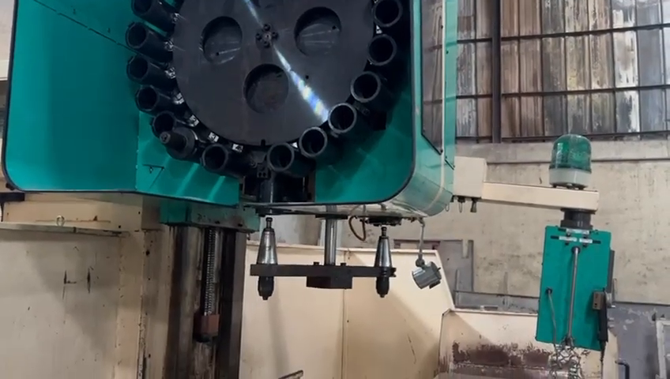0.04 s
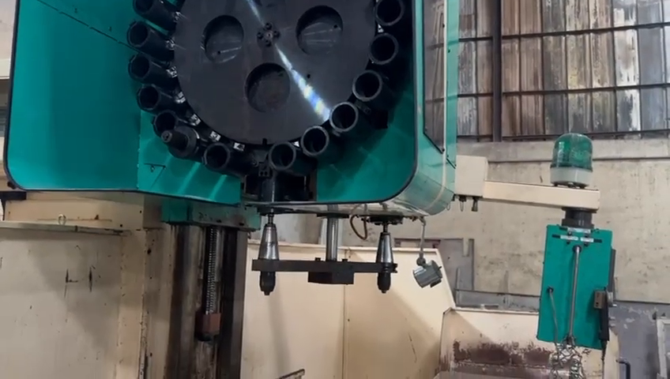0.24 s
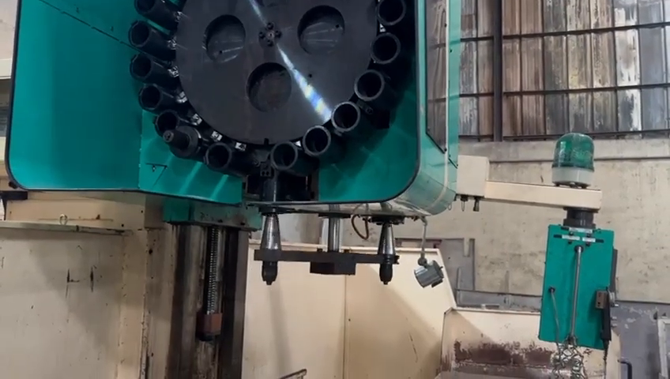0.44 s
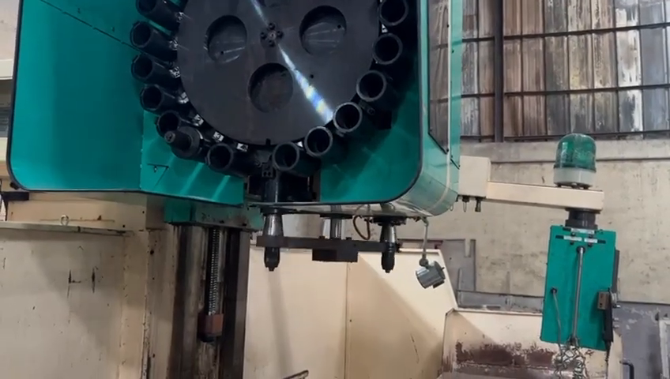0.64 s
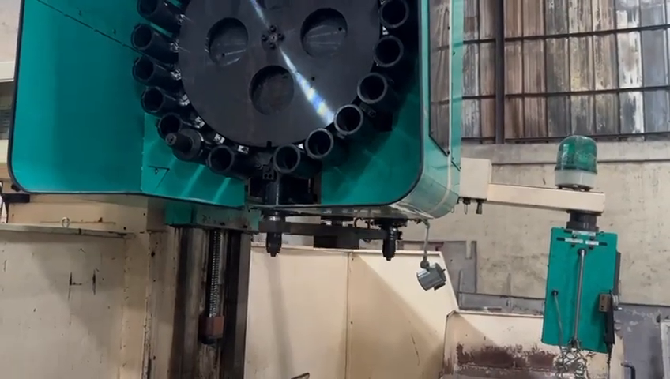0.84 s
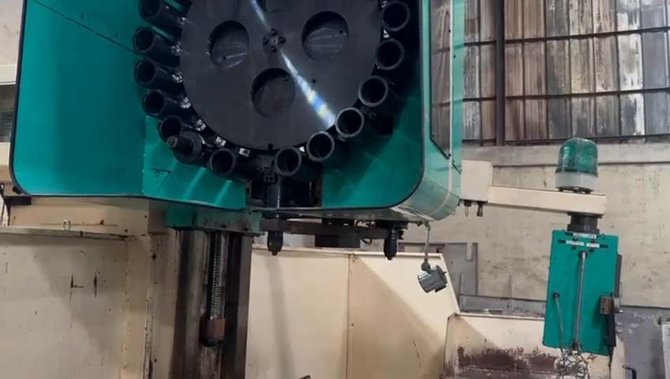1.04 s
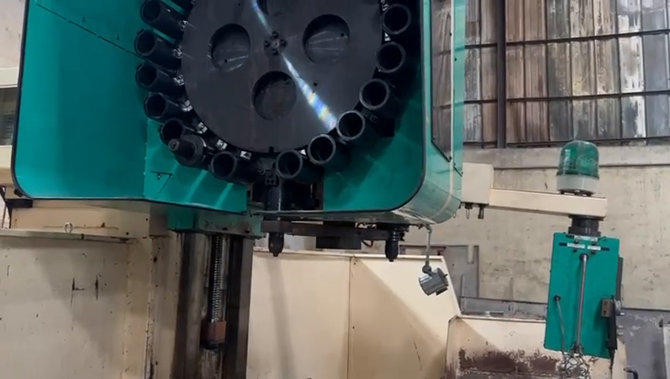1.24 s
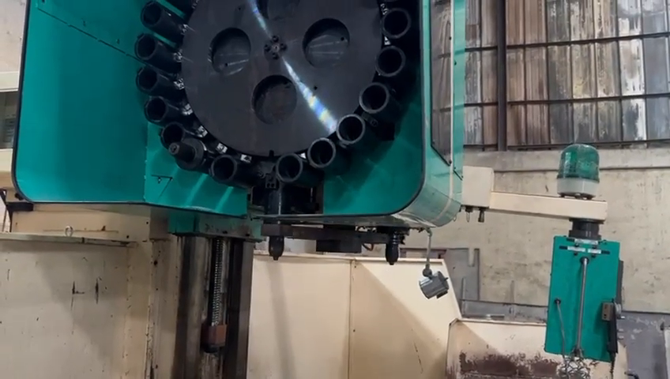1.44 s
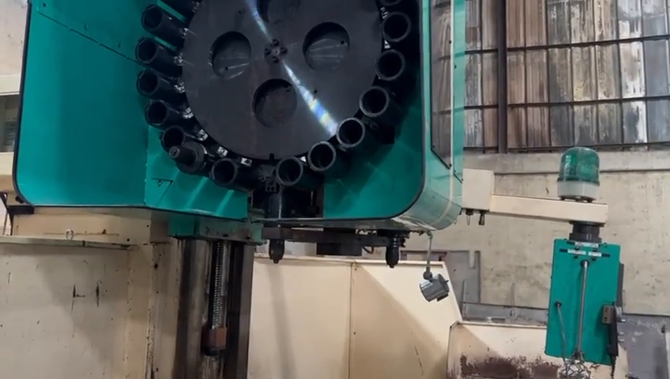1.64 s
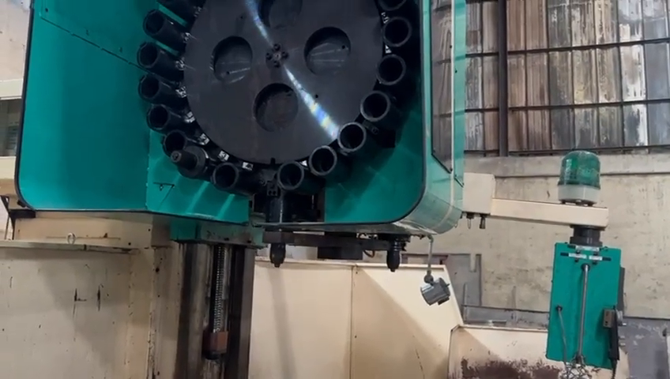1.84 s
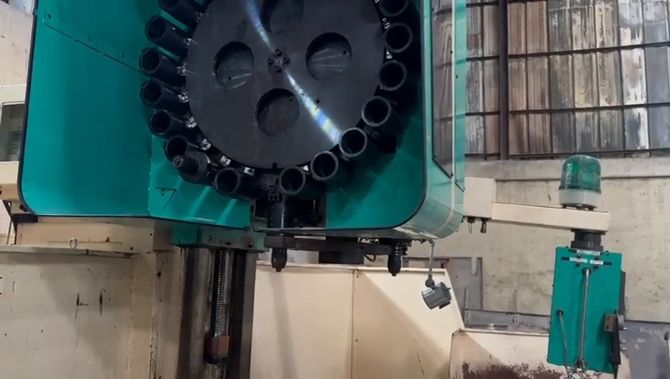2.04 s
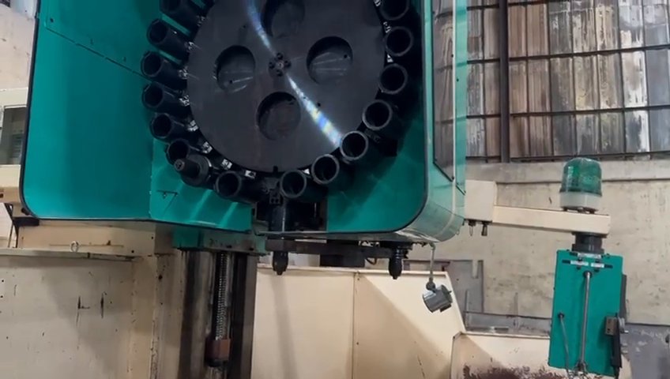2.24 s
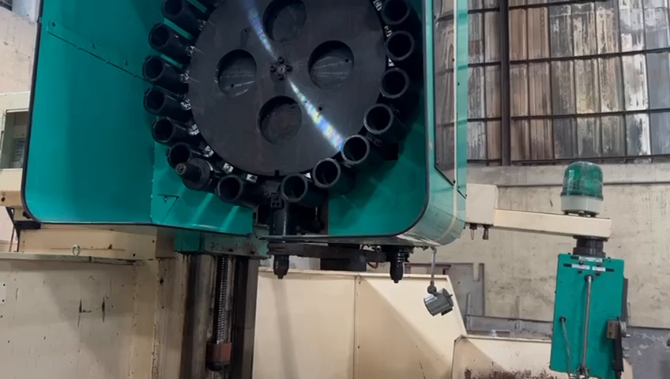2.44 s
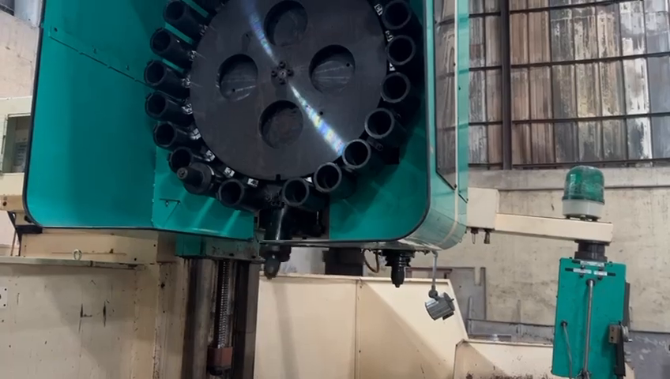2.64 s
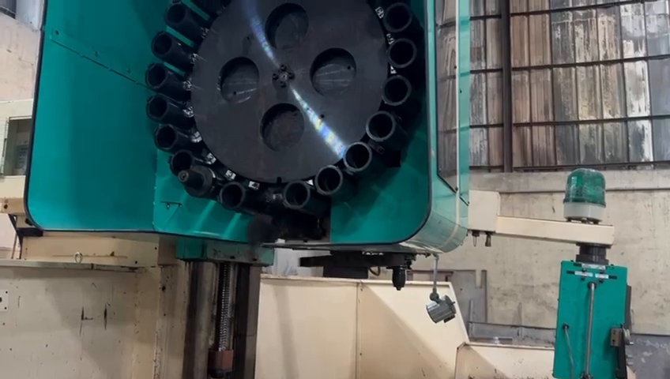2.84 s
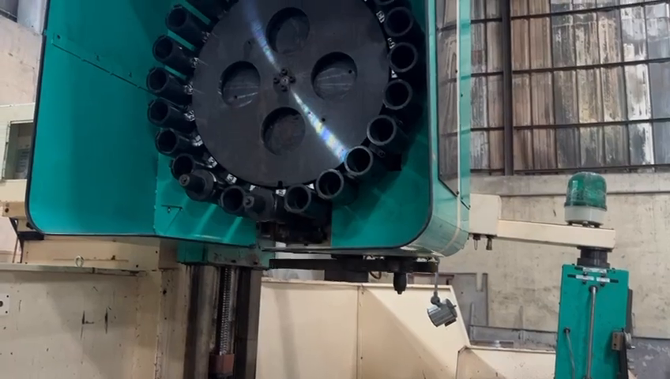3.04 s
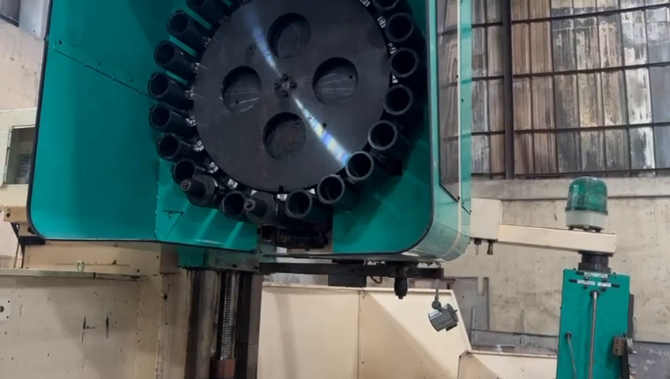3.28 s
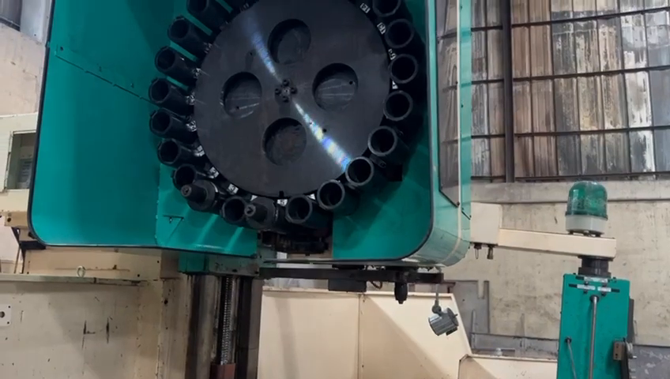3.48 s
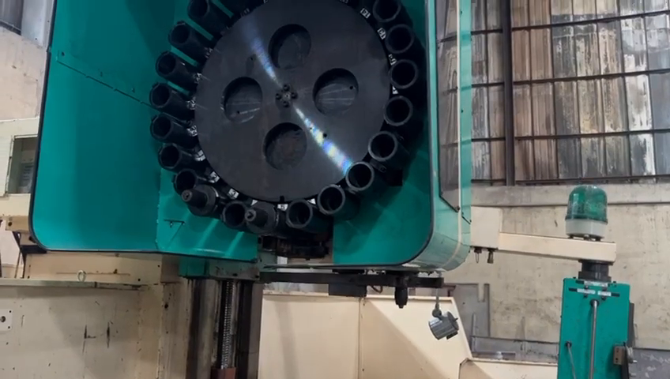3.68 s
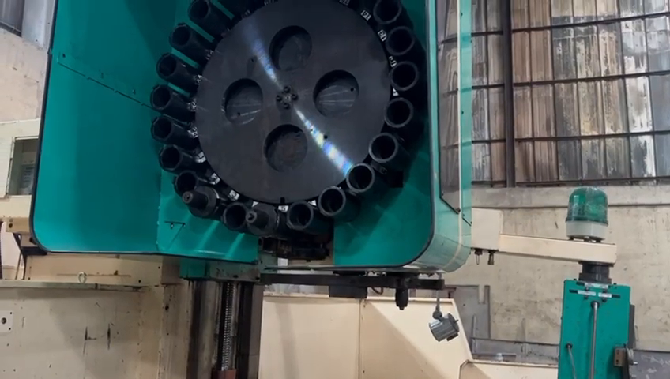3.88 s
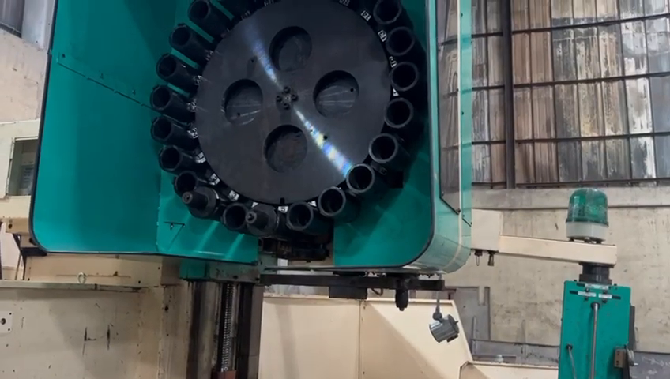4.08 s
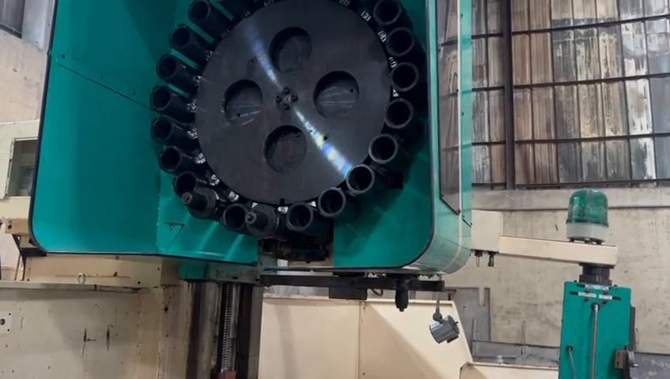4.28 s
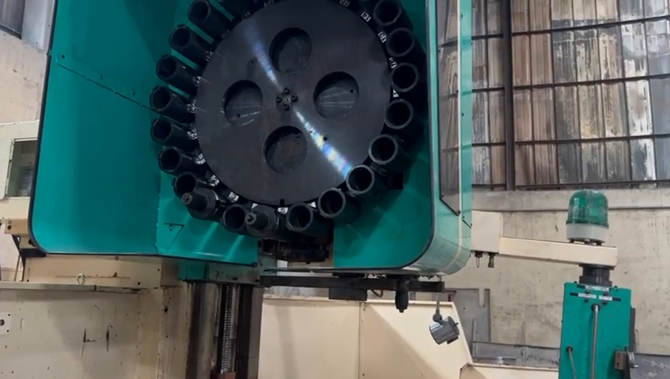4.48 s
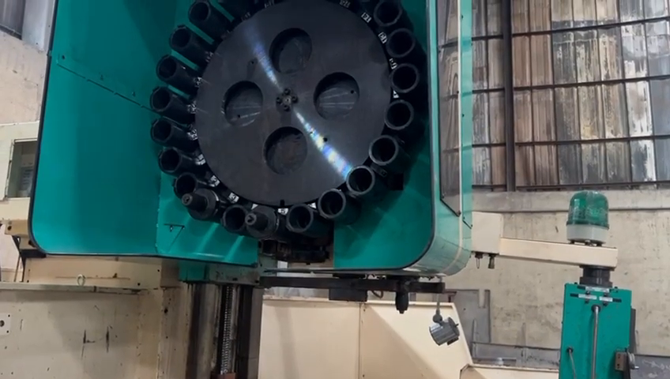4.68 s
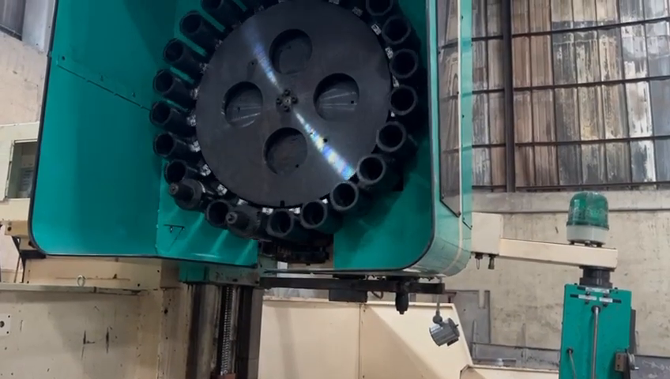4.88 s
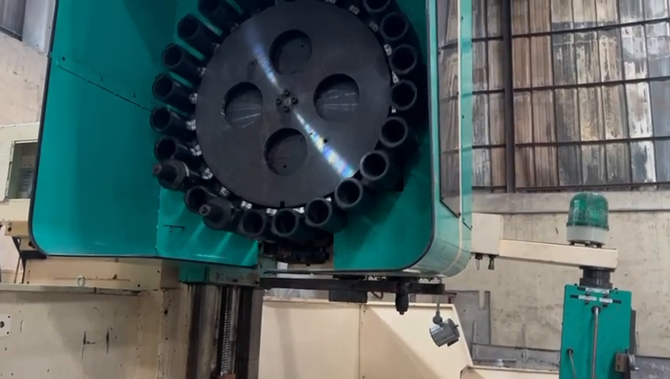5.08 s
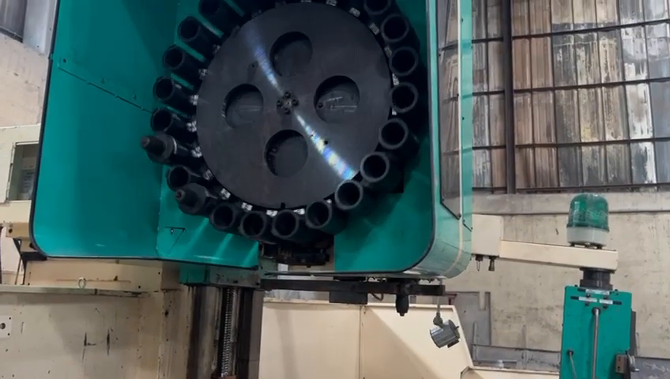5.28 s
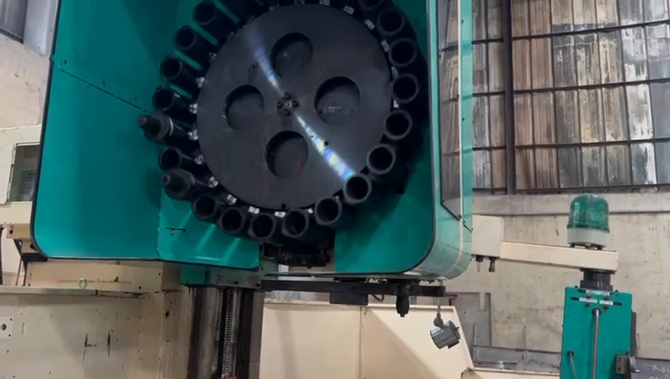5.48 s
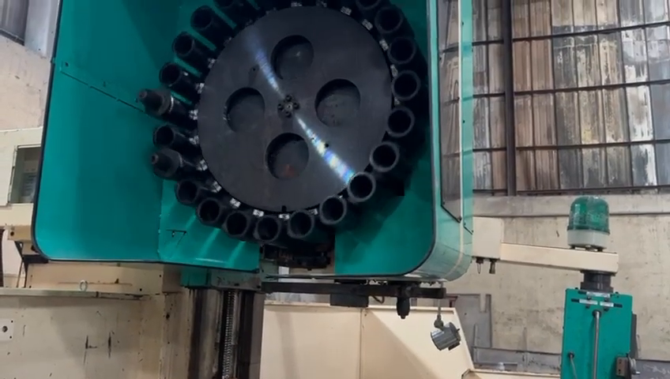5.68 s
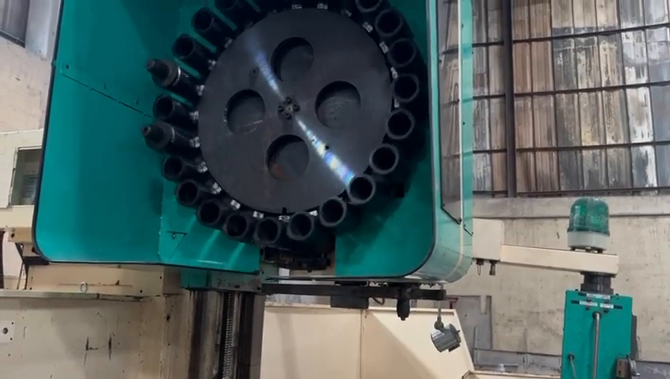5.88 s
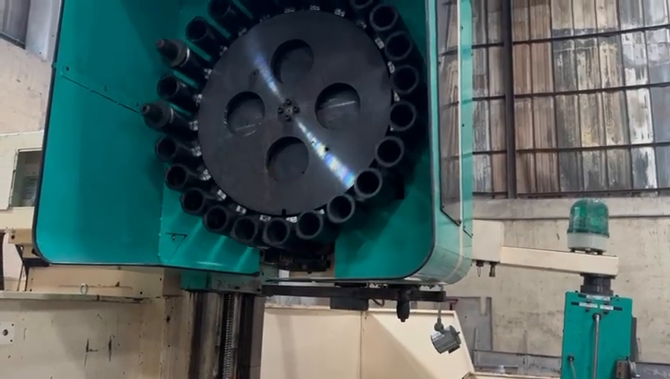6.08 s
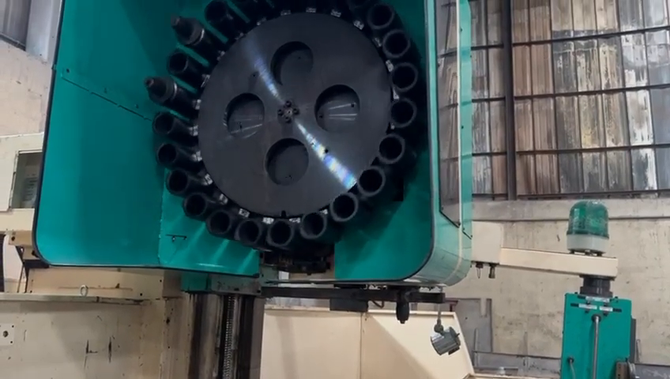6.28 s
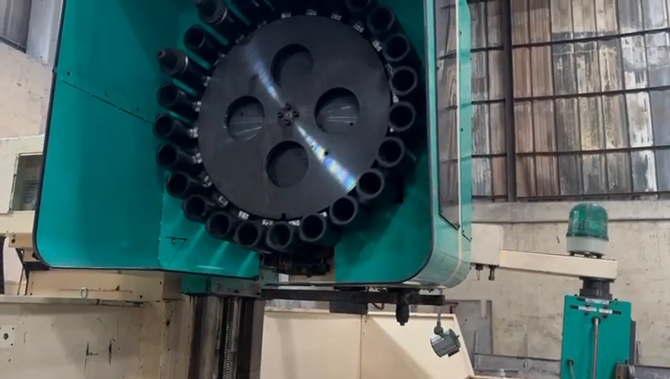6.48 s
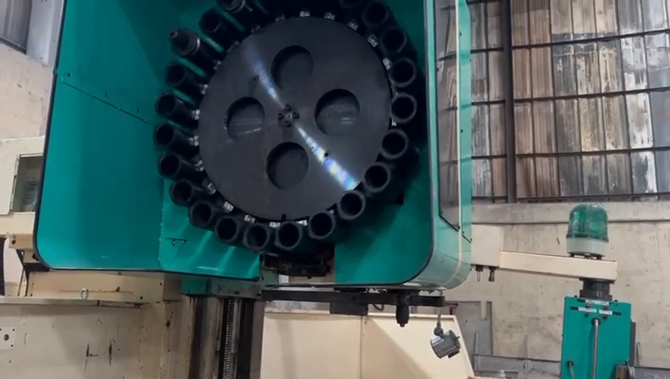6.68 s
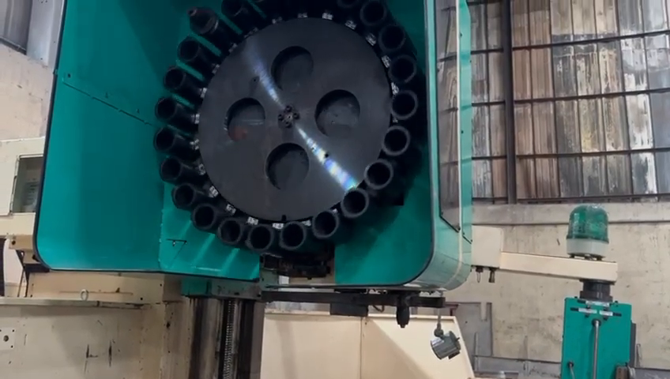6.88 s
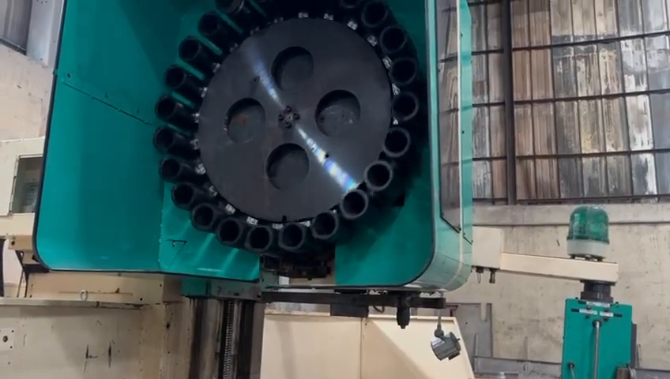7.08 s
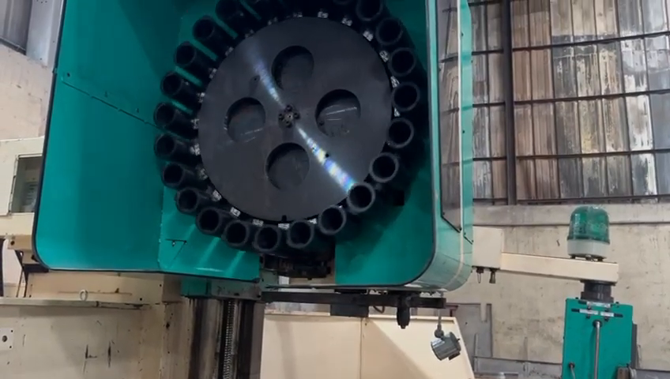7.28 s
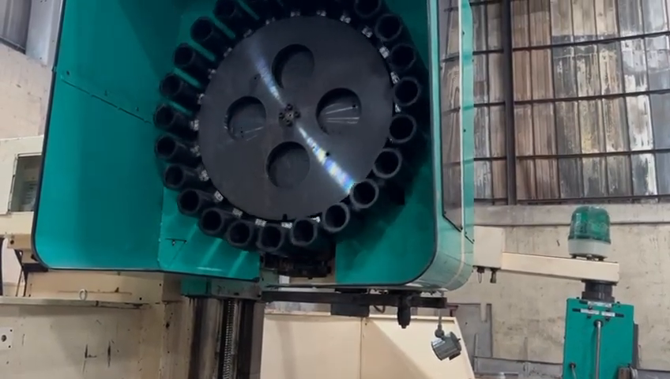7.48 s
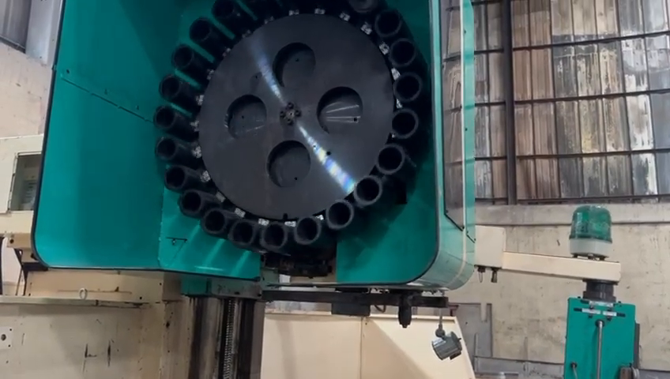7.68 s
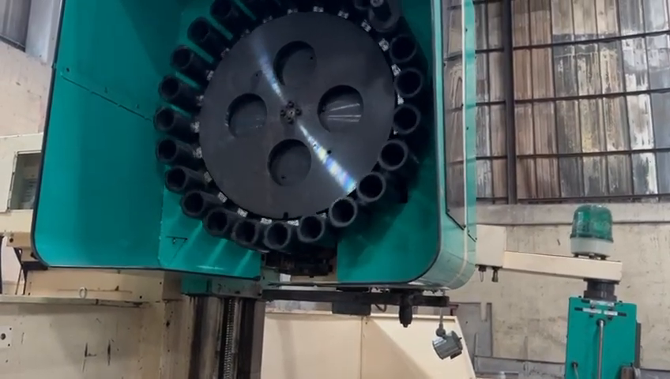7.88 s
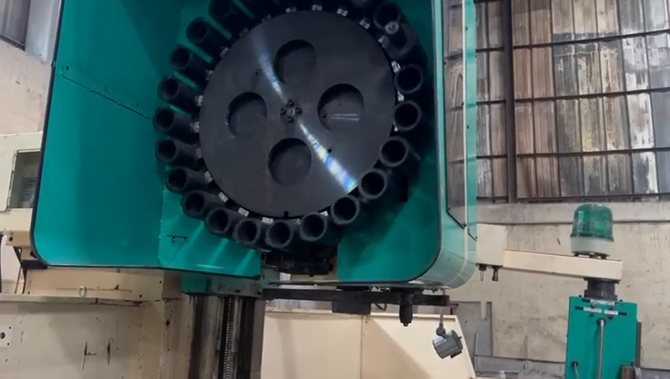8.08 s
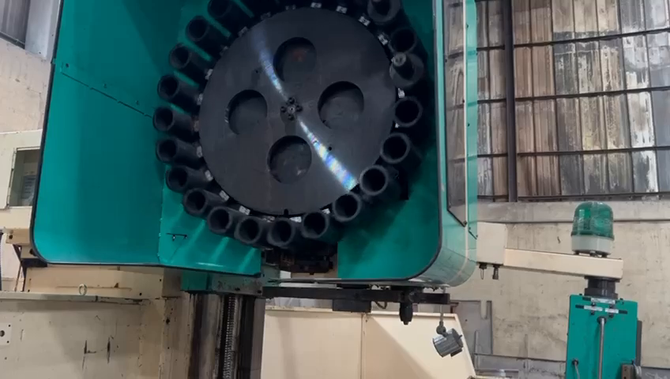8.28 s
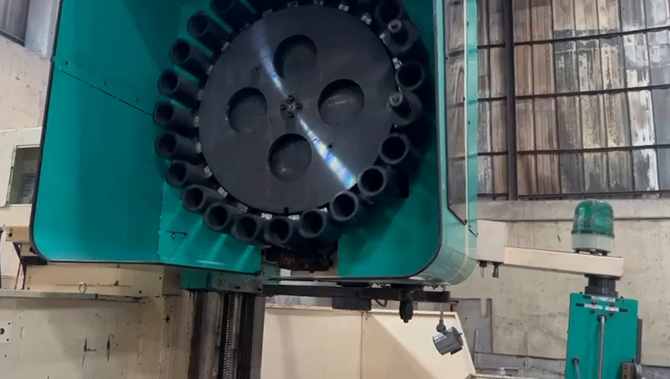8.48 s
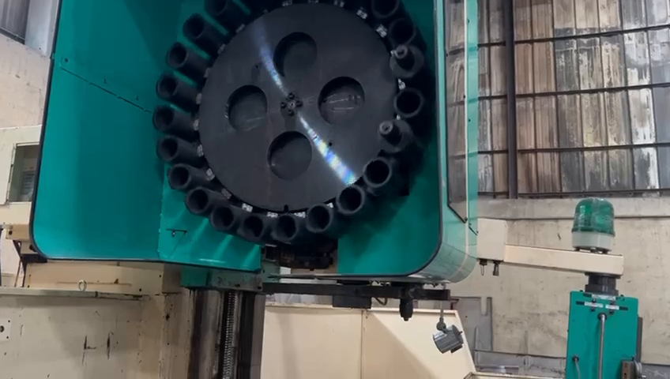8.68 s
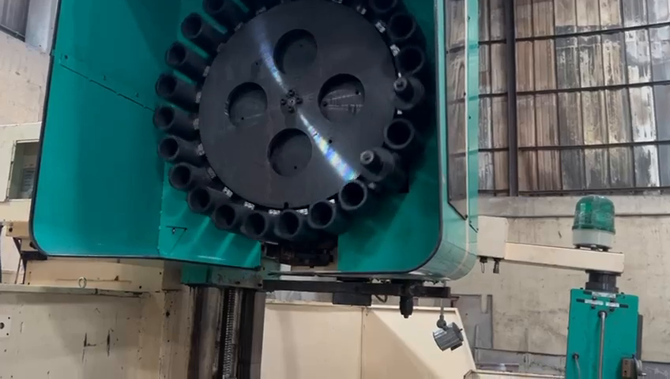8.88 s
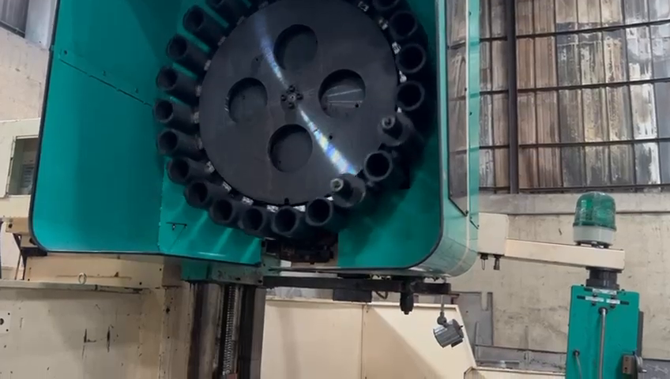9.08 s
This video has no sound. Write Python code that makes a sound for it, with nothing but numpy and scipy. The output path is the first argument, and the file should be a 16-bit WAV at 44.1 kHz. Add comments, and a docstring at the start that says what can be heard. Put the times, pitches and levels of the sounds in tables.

```python
"""A workshop, close to the tool changer of a machining centre, on a stereo pair of microphones.
Room air, mains hum and a pump lie behind. Up front the arm pulls a tool, swings and seats another
with heavy clunks of steel, housing and frame; air valves hiss and squeal. Then the magazine turns:
pocket after pocket rattles and knocks home over the rumble and whine of its drive."""
import sys
import numpy as np
from scipy import signal
from scipy.fft import rfft, irfft
from scipy.io import wavfile
from scipy.ndimage import uniform_filter1d, map_coordinates

SR = 44100
rng = np.random.default_rng(int(sys.argv[2]) if len(sys.argv) > 2 else 0)


def to_wav(sig):
    """Store sig (one row per channel, or 1-D mono) as 16-bit WAV at the path in sys.argv[1].

    Samples outside -1..1 are clipped; the rate is SR.
    """
    pcm = np.clip(np.atleast_2d(sig), -1, 1) * 32767
    pcm = np.round(pcm).astype(np.int16)
    wavfile.write(sys.argv[1], SR, pcm.T)  # frames by channels


N = 402631
TIME = np.arange(N) / SR

# resonances of the arm and headstock: f/Hz, width/Hz, lift/dB
HEAD_MODES = [(96, 7, 7), (111.5, 6, 5.5), (156.5, 11, 5), (176, 9, 3), (195, 5.7, 11), (273, 13, 6),
              (317, 22, 4), (430, 17, 5.5), (482, 11, 9), (535, 19, 7), (660, 25, 4), (900, 66, 1),
              (1140, 120, 7), (1330, 60, 1.5), (1557, 53, 7), (2440, 60, 6), (2900, 45, 5)]
# resonances and hollows of the magazine and its sheet-steel cover: f/Hz, width/Hz, lift/dB
MAGAZINE_MODES = [(65.5, 5.2, 13.5), (96, 6, 11), (162, 23, 3), (195.9, 3.2, 15.5), (221.9, 4.2, 12.5),
                  (267, 7.3, 6), (302, 6, 1.5), (430, 13.2, 6.5), (465, 30, 8.5), (624, 37, 4),
                  (685, 17, 4.5), (880, 32, 3), (1083, 13, 8.5), (1135, 19, 4.5), (1363.6, 11, 10),
                  (1664, 16, 12), (1810, 16, 5), (1860, 12, 3), (2010, 25, 4), (2237, 24, 7.5),
                  (2440, 65, -2), (2550, 31, 9), (2680, 350, -0.5)]
# colour of a click of steel: f/Hz, level/dB
CLICK_COLOUR = [(1200, -18), (3000, -1), (5500, 3), (8000, -2.5), (11500, -0.5)]


def from_db(db):
    """Decibels to gain."""
    return 10 ** (np.asarray(db) / 20)


def rms_one(x):
    """Scale to unit rms."""
    return x / np.sqrt(np.mean(x ** 2) + 1e-20)


def in_time(rows):
    """Each column of a curve at every sample."""
    s, *columns = np.transpose(rows)
    return [np.interp(TIME, s, c) for c in columns]


def at_hz(points, hz):
    """Read a table on a log-frequency axis."""
    f, value = np.transpose(points)
    return np.interp(np.log(hz + 1), np.log(f), value)


def drift(per_s):
    """Random wander of unit rms, with per_s turning points a second."""
    knots = rng.standard_normal(N // 8)
    position = np.arange(0, N + 16, 16) / SR * per_s
    return rms_one(map_coordinates(knots, [position], order=1))[np.arange(N) // 16]


def burst(start_s, rise_s, hold_s, dying_s):
    """Envelope that rises, holds and dies away."""
    t = TIME - start_s
    return np.clip(t / rise_s, 0, 1) * np.exp(-np.maximum(t - rise_s - hold_s, 0) / dying_s)


def tone(hz, db, waver_hz=0.686, waver_db=1.25):
    """A sine wavering slightly in level and pitch."""
    amplitude = np.sqrt(2) * from_db(db + waver_db * drift(9))
    return amplitude * np.sin(2 * np.pi * np.cumsum(hz + waver_hz * drift(7)) / SR)


def body(colour, modes=(), size=16384):
    """Impulse response of unit energy: a broad colour with resonances standing out of it."""
    hz = np.arange(size // 2 + 1) * SR / size
    gain = from_db(at_hz(colour, hz)) * hz / np.hypot(hz, 20) + 1e-6
    for centre, width, lift_db in modes:
        gain *= np.sqrt(1 + (from_db(lift_db) ** 2 - 1) / (1 + (2 * (hz - centre) / width) ** 2))
    cepstrum = irfft(np.log(gain))
    cepstrum[1:size // 2] *= 2   # minimum phase: nothing rings before the blow
    cepstrum[size // 2 + 1:] = 0
    response = irfft(np.exp(rfft(cepstrum)))[:size // 2]
    return response / np.linalg.norm(response)


def through(x, response):
    """Drive a response with a signal."""
    return signal.oaconvolve(x, response)[:len(x)]


def running(force, response):
    """A response under a force that has long been acting; rms 1."""
    return rms_one(through(np.concatenate([force[-len(response):], force]), response)[-N:])


def contacts(per_s, spread_db, count=N):
    """Random tiny impacts of uneven size."""
    sizes = from_db(spread_db * np.clip(rng.standard_normal(count), -2, 2))
    return sizes * rng.choice([-1, 1], count) * (rng.random(count) < per_s / SR)


def strike(out, s, db, dying_s, response, rise_s, per_s, size=14000):
    """Add one blow: parts with play meet in a dying burst of contacts, which rings the body."""
    t = np.arange(size) / SR
    envelope = np.minimum(t / rise_s, 1) * np.exp(-np.maximum(t - rise_s, 0) / dying_s)
    blow = through(contacts(per_s, spread_db=3.96, count=size) * envelope, response)
    blow *= from_db(db) * np.linalg.norm(envelope) / (np.linalg.norm(blow) + 1e-12)
    start = min(int(s * SR), N)
    out[start:start + size] += blow[:N - start]


def in_room(x, wet_db, size=32768):
    """Direct sound and the workshop's diffuse tail, which dies sooner in the treble."""
    # reverberation time: f/Hz, t60/s
    room_t60 = [(100, 0.85), (500, 0.73), (2000, 0.56), (9000, 0.25)]
    t, tail, edges = np.arange(size) / SR, 0, np.geomspace(40, 14000, 9)
    for low, high in zip(edges, edges[1:]):
        bandpass = signal.butter(2, [low, high], "band", fs=SR, output="sos")
        band = signal.sosfilt(bandpass, rng.standard_normal(size))
        tail += band * from_db(-60 * t / at_hz(room_t60, np.sqrt(low * high)))
    tail *= np.minimum(t / 0.0066, 1)
    return x + from_db(wet_db) * through(x, tail / np.linalg.norm(tail))


def panels(x, lowest_hz=1800):
    """Small sheet panels nearby reflect only short waves, which combs the treble."""
    # panel echoes: delay/s, level/dB
    echoes = [(.0022, -28), (.00385, -17.5), (.00615, -13.5)]
    treble = signal.sosfilt(signal.butter(2, lowest_hz, "high", fs=SR, output="sos"), x)
    return x + sum(from_db(db) * np.pad(treble, (int(s * SR), 0))[:N] for s, db in echoes)


def stereo(mid, width, scatter_s, oblique, size=16384):
    """The two microphones differ by a phase shift of oblique sound and by reflections."""
    t = np.arange(size) / SR
    scatter = rfft(rng.standard_normal(size) * np.exp(-t / scatter_s) * (t > .003))
    scatter /= np.sqrt(uniform_filter1d(np.abs(scatter) ** 2, size=40))   # equally strong in every band
    paths = (1j * oblique + scatter) / np.hypot(1, oblique)
    response = irfft(paths * from_db(at_hz(width, np.arange(len(paths)) * SR / size)))
    lead = size // 64
    side = signal.oaconvolve(mid, np.roll(response, lead))[lead:lead + N]
    return np.array([mid + side, mid - side])


def room_tone(db=-38):
    """The steady, dull rush of workshop air."""
    # colour of the air: f/Hz, level/dB
    colour = [(25, -27), (50, -4.5), (93, -2), (152, -4.5), (219, -6), (377, -8), (440, -3.5), (584, -10.5),
              (883, -13), (2000, -19), (4160, -26), (6500, -35.5), (8600, -41), (11200, -48)]
    return from_db(db) * running(rng.standard_normal(N), body(colour))


def pump():
    """The pump whines and slows under load; its octave throbs three times."""
    # effort of the pump: t/s, whine/dB, octave/dB
    effort = [(0, -47, -42), (.6, -48, -38.5), (.95, -46, -40), (1.15, -46, -32.5), (1.7, -47, -46),
              (2.3, -49, -45), (2.6, -45.5, -42.5), (3.4, -39.5, -40.5), (3.75, -48, -43), (4.05, -48, -49),
              (4.4, -45.5, -50), (9.13, -45, -60)]
    # pitch of its whine: t/s, f/Hz
    pitch = [(.2, 223.5), (.5, 216.5), (.9, 217), (1.1, 223), (2.4, 223.7), (2.7, 219.5), (3.05, 221),
             (3.35, 223.7)]
    # swells of the octave: middle t/s, half length/s, level/dB
    throbs = [(3.065, 0.063, -30.5), (3.24, 0.034, -31), (3.36, 0.036, -34.5)]
    whine_db, octave_db = in_time(effort)
    hz, = in_time(pitch)
    throb = sum(from_db(db) * np.exp(-((TIME - s) / half_s) ** 2) for s, half_s, db in throbs)
    return tone(hz, whine_db) + np.hypot(from_db(octave_db), throb) * tone(2 * hz, db=0)


def hum(mains_hz=100):
    """Mains hum slowly swells and fades over fainter motor tones."""
    # swell of the hum: t/s, level/dB
    swell = [(.5, -40), (.75, -40), (.9, -58), (1.35, -43), (1.58, -34.5), (2.05, -34), (2.35, -43.5),
             (2.8, -56), (3.08, -39), (3.38, -35), (3.8, -48), (4.15, -35), (4.7, -34.5), (4.9, -46)]
    # steady motor tones: f/Hz, level/dB
    motors = [(195, -54), (226, -49), (301, -50), (422, -50.5), (473, -56), (522, -59), (894, -56),
              (1567, -70), (2213, -65.5)]
    mains_db, = in_time(swell)
    return tone(mains_hz, mains_db) + sum(tone(hz, db) for hz, db in motors)


def cam(rise_s=0.066, dying_s=0.29):
    """The arm's cam gear growls with dense small contacts, once out and once back."""
    # runs of the cam: t/s, hold/s, level/dB
    runs = [(0.147, 1.32, -33.5), (2.337, 0.52, -34.5)]
    # colour of the growl: f/Hz, level/dB
    colour = [(30, -10), (70, 4), (130, 5), (300, 3.5), (480, -2.5), (700, -7), (1300, -18.5), (3000, -22),
              (9000, -65)]
    effort = sum(from_db(db) * burst(s, rise_s, hold_s, dying_s) for s, hold_s, db in runs)
    return effort * running(contacts(1600, spread_db=2.5), body(colour, HEAD_MODES))


def step_times(count=19, first_s=5.0115, step_s=.22234, load_swing_s=.00933, slowest=3.2, per_turn=24):
    """When each magazine step starts: the load of tools slows it going up and speeds it coming down."""
    gaps = step_s + load_swing_s * np.cos(2 * np.pi * (np.arange(count) - slowest) / per_turn)
    return first_s + np.cumsum(gaps) - gaps


def surging(x, swing_db=2.8, peak_lag_s=.095, top_hz=330, step_s=.22234):
    """The bass of the drive swells in the middle of every step and slackens between steps."""
    starts = step_times()
    starts = np.concatenate([[starts[0] - step_s], starts, [starts[-1] + step_s]])
    steps = np.interp(TIME - peak_lag_s, starts, np.arange(len(starts)))
    bass = signal.sosfiltfilt(signal.butter(2, top_hz, fs=SR, output="sos"), x)
    bass_gain = from_db(swing_db * np.cos(2 * np.pi * steps) - 1)
    return x + bass * (bass_gain - 1)


def gear_whine(jitter_hz=4.47, flutter_db=3.6):
    """The magazine's gears sing in unsteady lines, louder once the load of tools runs downhill."""
    # lines of the whine: f/Hz, relative level/dB
    lines = [(466, -16), (684, 0), (1083, -1), (1122, -6), (1364, -9), (1666, -13)]
    # swell of the whine: t/s, level/dB
    swell = [(4.8, -44), (5.6, -50), (6.9, -49), (7.5, -41.5), (8.3, -41), (8.7, -39.5), (9.1, -42)]
    level_db, = in_time(swell)
    return sum(tone(hz + jitter_hz * drift(45), level_db + db + flutter_db * drift(22))
               for hz, db in lines)


def magazine_drive(start_s=4.79, rise_s=0.028, db=-25.5, relative_tick_db=-27):
    """As the magazine turns, its rollers rumble, its gears whine and tools tick in their pockets."""
    # colours of the rollers and of the shaking tools: f/Hz, level/dB
    roller_colour = [(30, -24), (60, -8.5), (120, -3.5), (170, 0.5), (280, -4), (450, -1.5), (700, -3),
                     (1150, -5.5), (1400, -14.5), (1650, -24), (3000, -24), (4200, -30.5), (5500, -32.5),
                     (8300, -35.5), (11500, -34.5)]
    tick_colour = [(1000, -20), (3000, -6), (5500, -5), (8000, -10), (11300, 6)]
    rolling = contacts(2000, spread_db=2.6) * from_db(0.87 * drift(30))
    rumble = surging(running(rolling, body(roller_colour, MAGAZINE_MODES)))
    shaking = contacts(1800, spread_db=3) * from_db(5.1 * np.clip(drift(110), -2, 2))
    ticks = from_db(relative_tick_db) * running(shaking, body(tick_colour))
    turning = np.clip((TIME - start_s) / rise_s, 0, 1)
    return turning * (from_db(db) * (rumble + ticks) + gear_whine())


def valve_hiss(exhaust_leak_db=-64, jet_leak_db=-72):
    """Each valve lets turbulent air out through a wide exhaust and a narrow jet, over a faint leak."""
    # valves venting: t/s, rise/s, hold/s, dying time/s, exhaust/dB, jet/dB
    vents = [(.14, .17, .02, .04, -60, -48), (0.954, 0.047, .015, 0.048, -40.5, -32),
             (1.04, .05, .13, 0.079, -54, -40), (1.617, 0.22, 0.12, 0.53, -41.5, -55.5),
             (2.35, 0.055, .02, .13, -49, -55), (2.45, 0.19, 0.3, 0.083, -65, -43.5),
             (3.02, .1, .08, .08, -64, -50)]
    # colours of the two outlets: f/Hz, level/dB
    exhaust_colour = [(400, -33), (1000, 10.5), (2000, 6.5), (3200, 8), (5000, 1.5), (7000, -12),
                      (11500, -43)]
    jet_colour = [(1500, -27), (4000, 4), (6300, 11.5), (8200, 9), (11500, 4)]
    exhaust, jet = from_db(exhaust_leak_db), from_db(jet_leak_db)
    for s, rise_s, hold_s, dying_s, exhaust_db, jet_db in vents:
        flow = burst(s, rise_s, hold_s, dying_s)
        exhaust = np.hypot(exhaust, from_db(exhaust_db) * flow)
        jet = np.hypot(jet, from_db(jet_db) * flow)
    return (exhaust * running(rng.standard_normal(N), body(exhaust_colour))
            + jet * running(rng.standard_normal(N), body(jet_colour)))


def valve_squeal(jitter_hz=120, flutter_db=2.5, skirt_hz=260, rasp_hz=1000, rasp_db=-16):
    """Unsteady edge tones, in a skirt of turbulence and a wider rasp, sink as the pressure falls."""
    # whistles of a venting valve, one list each: t/s, f/Hz, level/dB
    whistles = [
        [(3.04, 9000, -56), (3.1, 9010, -35), (3.125, 8940, -37), (3.145, 8690, -32), (3.17, 8600, -30),
         (3.2, 8560, -32), (3.225, 8650, -42), (3.25, 8700, -60)],
        [(3.0, 11250, -60), (3.08, 11240, -50), (3.17, 11250, -53), (3.24, 11250, -48), (3.3, 10600, -50),
         (3.36, 10600, -62)],
        [(3.06, 7520, -58), (3.15, 7450, -53), (3.195, 7100, -43.5), (3.24, 6980, -58)],
        [(3.15, 6500, -64), (3.19, 6450, -50), (3.23, 6400, -62)],
        [(3.15, 5200, -62), (3.19, 5180, -49), (3.23, 5150, -62)],
    ]
    # noisy share of each whistle, 0-1
    noisy_shares = [.35, .55, .55, .55, .5]
    out = np.zeros(N)
    for rows, share in zip(whistles, noisy_shares):
        hz, db = in_time(rows)
        phase = 2 * np.pi * np.cumsum(hz + jitter_hz * drift(900)) / SR
        skirt, rasp = (rms_one(signal.lfilter(*signal.butter(2, width, fs=SR), rng.standard_normal(N)))
                       for width in (skirt_hz, rasp_hz))
        edge = (np.sqrt(1 - share) + from_db(rasp_db) * rasp) * np.sin(phase)
        edge += np.sqrt(share) * skirt * np.cos(phase)
        sounding = (TIME > rows[0][0]) & (TIME < rows[-1][0])
        out += np.sqrt(2) * edge * from_db(db + flutter_db * drift(120)) * sounding
    return out


def steel_ring(x, centre_hz=8500, width_hz=380, t60_s=.7, ring_db=-20, skirt_db=-6, size=40000):
    """A sound together with the cluster of close steel modes that it sets ringing."""
    t, hz = np.arange(size) / SR, np.arange(size // 2 + 1) * SR / size
    cluster = from_db(skirt_db) + 1 / (1 + (2 * (hz - centre_hz) / width_hz) ** 2)
    tail = irfft(rfft(rng.standard_normal(size)) * cluster) * from_db(-60 * t / t60_s)
    return x + from_db(ring_db) * np.std(x) * rms_one(through(x, tail))


def latches(dying_s=0.013):
    """Small latches snap shut, each with a short, bright click."""
    # snaps: t/s, level/dB
    snaps = [(1.156, -26.5), (2.503, -41), (2.554, -38)]
    out, steel = np.zeros(N), body(CLICK_COLOUR)
    for s, db in snaps:
        strike(out, s, db, dying_s, steel, rise_s=.004, per_s=5100)
    return out


def arm_groans(rise_s=0.011, dying_s=.012):
    """Under load the arm's drive booms, sinking in pitch as it slows."""
    # booms: t/s, length/s, first f/Hz, last f/Hz, level/dB
    booms = [(.972, 0.042, 168, 158, -18.5), (1.025, .075, 202.7, 185, -22.5),
             (1.105, .04, 184, 170, -23.5), (1.315, .075, 200, 181, -27)]
    out = np.zeros(N)
    for s, length_s, first_hz, last_hz, db in booms:
        hz = np.interp(TIME, [s, s + length_s], [first_hz, last_hz])
        out += burst(s, rise_s, length_s - rise_s, dying_s) * tone(hz, db, waver_hz=1.56, waver_db=1.5)
    return out


def frame_swings(push_s=0.0098):
    """Heavy blows push on the frame, which keeps swinging."""
    # swings of the frame: t/s, f/Hz, level/dB, t60/s
    swings = [(.955, 96.5, -20.5, 0.53), (.953, 1082, -26.5, .35), (1.246, 428, -19.5, 0.26),
              (4.741, 531, -16.5, 0.17), (3.335, 98, -31, .35)]
    out = np.zeros(N)
    for s, hz, db, t60 in swings:
        t = np.maximum(TIME - s, 0)
        out += from_db(db - 60 * t / t60) * np.sin(2 * np.pi * hz * t) * np.minimum(t / push_s, 1)
    return out


def pockets(rattle_db=-20.3, bounce_s=.0125, detune=.007, click_lead_s=.006, rebound_s=.015):
    """Loose pockets clack and bounce as each step starts, then knock home at the pitch of their tool."""
    # ringing of the steel pockets: f/Hz, width/Hz, lift/dB
    modes = [(431, 20, 5), (467, 26, 7.5), (680, 60, 3), (1110, 80, 5), (1360, 23, 6), (1810, 45, 6),
             (2020, 50, 8), (2245, 45, 14), (2440, 90, 6), (2550, 45, 8), (2750, 200, -5), (2937, 45, 10),
             (3140, 120, -8), (3400, 75, 4.5), (3550, 110, -13), (3750, 90, 4.5), (3996, 55, 10),
             (4365, 90, 4), (4490, 100, 9.5), (5760, 230, -6), (6000, 80, 6.5), (6600, 80, 4.5),
             (7880, 90, 8.5), (8330, 110, 7.5)]
    # colours of the rattle and the knock: f/Hz, level/dB
    rattle_colour = [(150, -10.5), (450, 16), (1000, 9.5), (1600, 1.5), (2500, 1), (4400, -3), (6000, -11),
                     (8300, -10.5), (11500, -15)]
    knock_colour = [(100, -16), (300, -9), (480, -5), (640, 1), (980, -1.5), (1250, -8), (1700, -21),
                    (3000, -25.5), (4400, -31), (6500, -32), (11500, -46)]
    # pockets knocking home: t/s, level/dB, dying time/s, tool f/Hz
    knocks = [(4.815, -19.5, .045, 1120), (5.048, -24, .02, 480), (5.277, -23, .018, 1090),
              (5.511, -13.5, 0.0086, 1020), (5.743, -13.5, 0.014, 686), (5.973, -13, .012, 945),
              (6.204, -11.5, 0.013, 630), (6.433, -12.5, 0.013, 650), (6.662, -12.5, 0.009, 630),
              (6.891, -18, .015, 1000), (7.118, -16.5, 0.01, 1000), (7.336, -12, .0094, 640),
              (7.558, -12.5, 0.016, 850), (7.775, -13, 0.02, 1000), (7.994, -11.5, 0.014, 900),
              (8.206, -9.5, 0.015, 885), (8.427, -20, 0.021, 680), (8.637, -19, 0.02, 680),
              (8.857, -24.5, .015, 700), (9.067, -22.5, .016, 640)]
    out, steel = np.zeros(N), body(CLICK_COLOUR, modes)
    for s in step_times():
        # no two pockets ring quite alike
        own_modes = [(hz * (1 + detune * rng.standard_normal()), width, db) for hz, width, db in modes]
        rattle = body(rattle_colour, own_modes)
        strike(out, s, rattle_db, dying_s=0.0085, response=rattle, rise_s=0.0075, per_s=6000)
        strike(out, s + bounce_s, rattle_db - 4.5, 0.025, rattle, rise_s=0.0028, per_s=3000)
    for s, db, dying_s, tool_hz in knocks:
        tool_mode = (tool_hz, 80, 6)   # 80 Hz wide, lifted 6 dB
        knock = body(knock_colour, MAGAZINE_MODES + [tool_mode])
        strike(out, s, db, dying_s, knock, rise_s=0.003, per_s=4000)
        strike(out, s + rebound_s, db - 12, dying_s=.005, response=knock, rise_s=0.003, per_s=4000)
        strike(out, s - click_lead_s, db - 24, dying_s=0.013, response=steel, rise_s=0.003, per_s=2500)
    return out


def clunks(thud_lag_s=0.012):
    """Each clunk is a clash of steel, a knock of the housing and a later thud of the heavy frame."""
    # arm, spindle clamp, pocket and lurching magazine: t/s, thud/dB, knock/dB, clash/dB, dying time/s
    blows = [(.139, -20.5, -19, -29.5, 0.032), (.375, -30, -43, -60, .04), (.928, -32, -31, -40, 0.027),
             (.947, -16.5, -15.5, -32, 0.023), (1.005, -21, -30, -42, 0.04), (1.157, -21, -34, -39, 0.012),
             (1.238, -27, -24.5, -58, 0.023), (1.276, -23.5, -27.5, -54, .026),
             (2.334, -29, -21.5, -23, 0.033), (2.492, -36, -30, -54, 0.028), (2.56, -37, -28, -45, 0.018),
             (3.325, -34, -37, -61, 0.027), (4.733, -30, -22.5, -33.5, 0.024),
             (4.815, -24, -32, -63, 0.029), (4.88, -29, -40, -60, .04)]
    # colours of the three contacts: f/Hz, level/dB
    thud_colour = [(30, -23), (60, -4.5), (110, -6), (170, -1.5), (280, -7.5), (450, -16.5), (1000, -48),
                   (4000, -72)]
    knock_colour = [(100, -36), (300, -5.5), (450, -2), (650, -2), (850, -6), (1100, -12), (1600, -19.5),
                    (3000, -32), (8000, -35.5)]
    clash_colour = [(300, -25), (1200, 11.5), (2400, 6.5), (4000, 1.5), (6000, -4), (8200, 0),
                    (11500, -5.5)]
    # ringing of the steel gripper and tool shank: f/Hz, width/Hz, lift/dB
    gripper_modes = [(1990, 35, 5.7), (2270, 50, 7.8), (2450, 65, 7.4), (2690, 33, 8.3), (2980, 35, 8.7),
                     (3200, 70, 6.1), (4230, 120, 5), (4700, 90, 4)]
    thud, knock = body(thud_colour, HEAD_MODES), body(knock_colour, HEAD_MODES)
    clash = body(clash_colour, gripper_modes)
    out = np.zeros(N)
    for s, thud_db, knock_db, clash_db, dying_s in blows:
        strike(out, s + thud_lag_s, thud_db, dying_s, thud, rise_s=0.012, per_s=1500)
        strike(out, s, knock_db, dying_s, knock, rise_s=0.0075, per_s=2600)
        strike(out, s, clash_db, dying_s, clash, rise_s=0.0092, per_s=5000)
    return out


def scene():
    """At the microphones: blows, valves and gears close by, diffuse workshop air all around."""
    # stereo width of the machine and of the workshop air: f/Hz, side minus mid/dB
    machine_width = [(40, -43), (100, -30), (260, -23), (500, -14.5), (1100, -8), (1700, -4), (4200, -4.5),
                     (6000, -6), (7400, -18), (8100, -21), (8700, 5), (10300, 15.5), (11200, -27)]
    shop_width = [(40, -23), (100, -13.5), (200, -3), (700, 0), (1500, 2.5), (2700, -3), (6000, -2.5),
                  (7400, -27), (8200, -14), (8900, 9), (10300, 15), (11200, -16)]
    shop = room_tone()
    blows = in_room(clunks() + latches() + pockets(), wet_db=-10) + frame_swings() + arm_groans()
    valves = in_room(steel_ring(valve_squeal()), wet_db=-13.5) + valve_hiss()
    mix = stereo(panels(blows + valves), machine_width, scatter_s=0.0074, oblique=1.0)
    mix += stereo(panels(cam() + magazine_drive()), machine_width, scatter_s=0.12, oblique=0.2)
    mix += stereo(panels(shop), shop_width, scatter_s=0.079, oblique=0.05)
    return mix + pump() + hum()


def record(dry, dip_hz=(8950, 10400), cutoff_hz=11750):
    """A narrow band of the treble is hollowed out; the top is cut."""
    hollow = signal.sosfilt(signal.butter(3, dip_hz, "bandstop", fs=SR, output="sos"), dry)
    return signal.sosfilt(signal.ellip(10, .3, 80, cutoff_hz, fs=SR, output="sos"), hollow)


dry = scene()
out = record(dry)
to_wav(out)
```